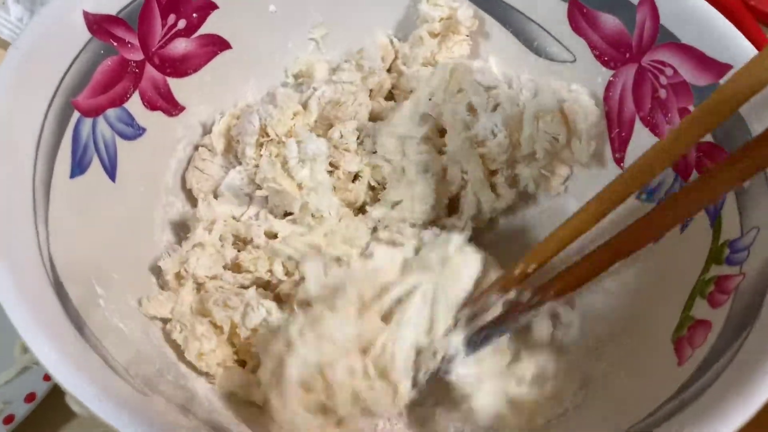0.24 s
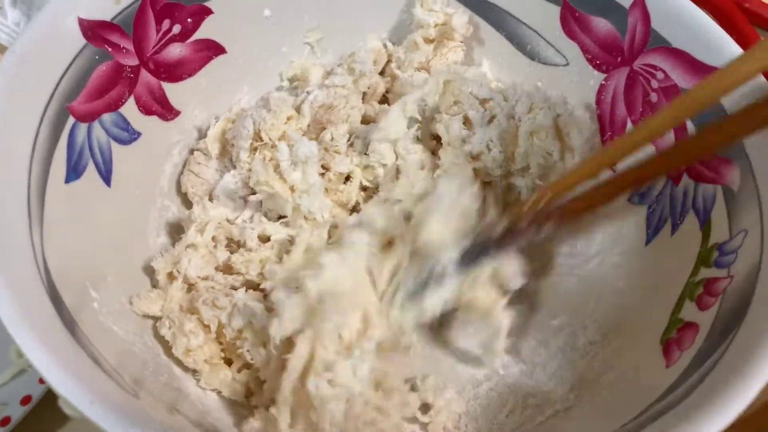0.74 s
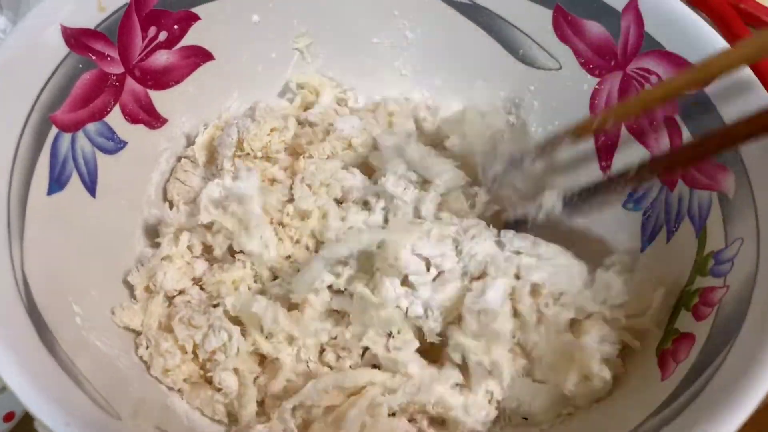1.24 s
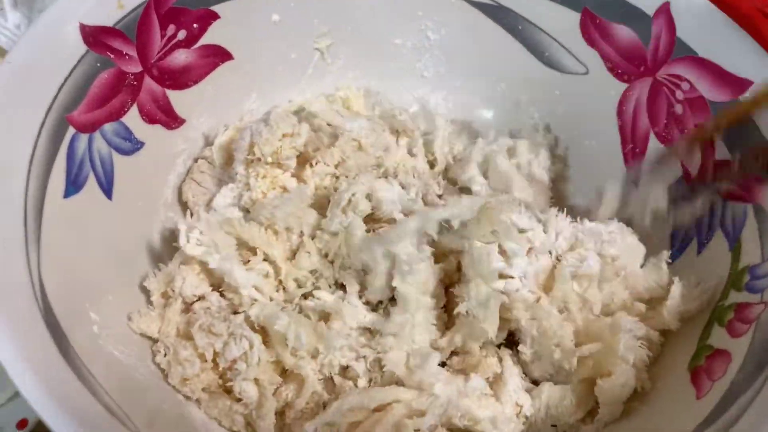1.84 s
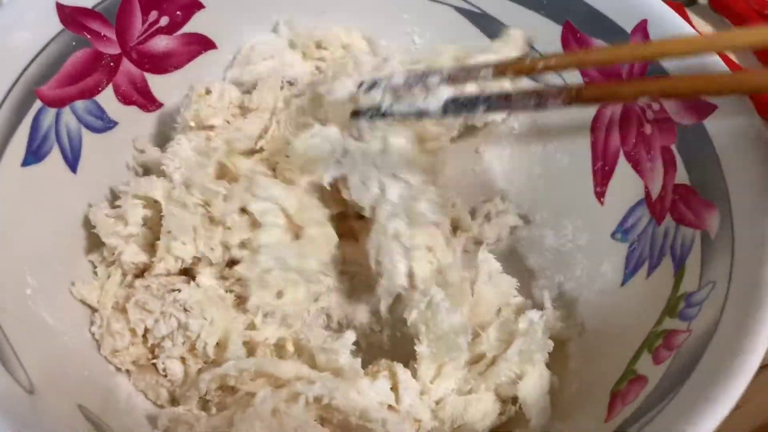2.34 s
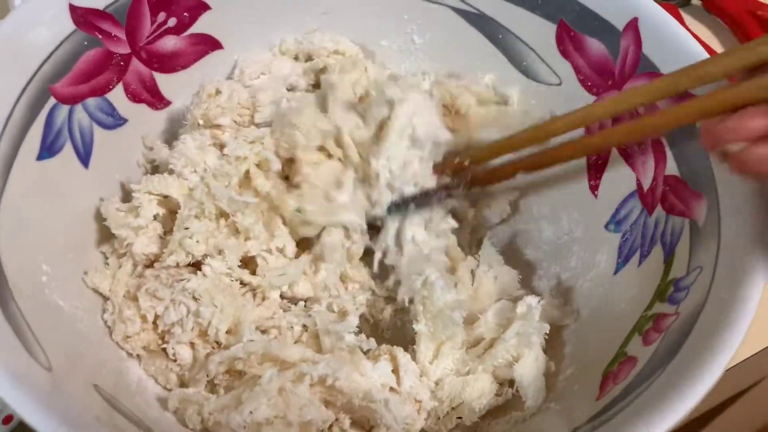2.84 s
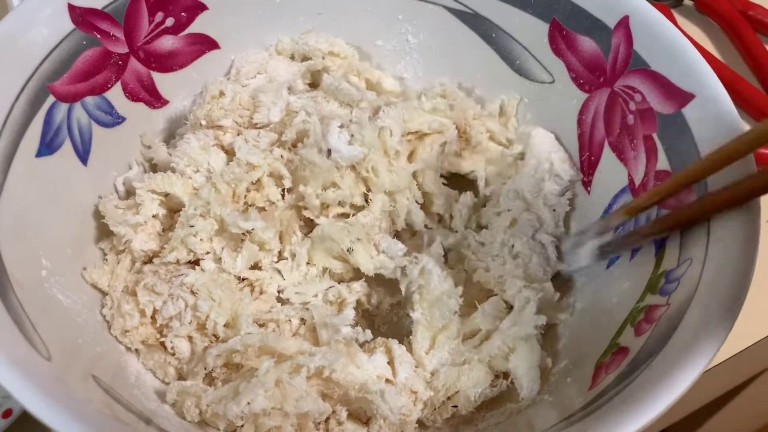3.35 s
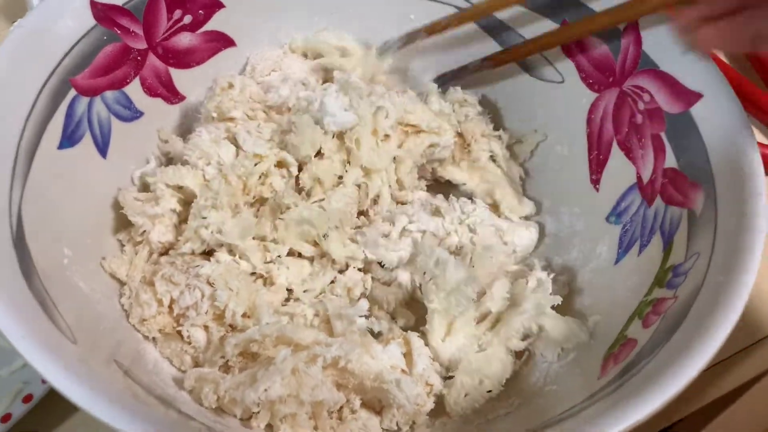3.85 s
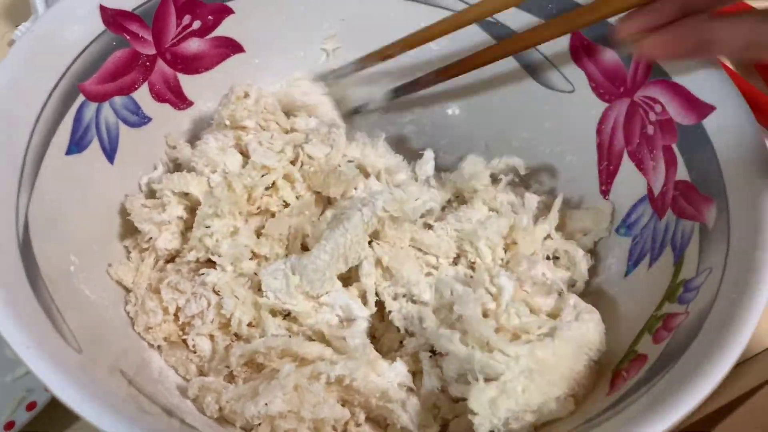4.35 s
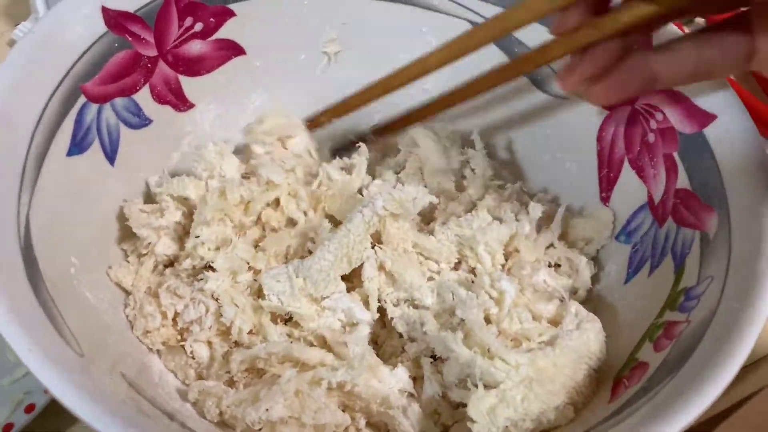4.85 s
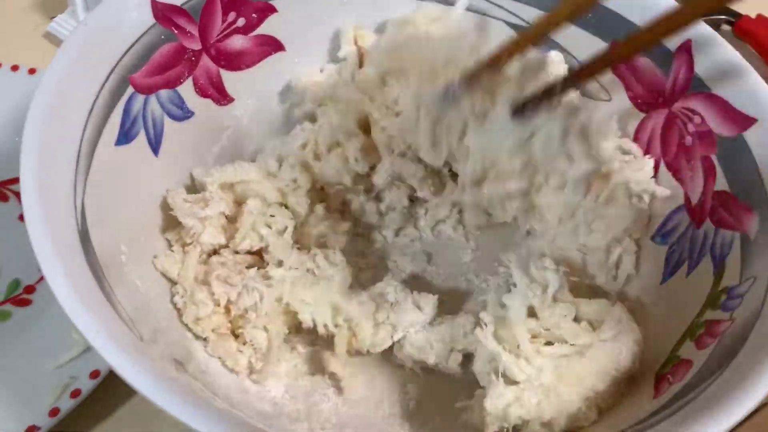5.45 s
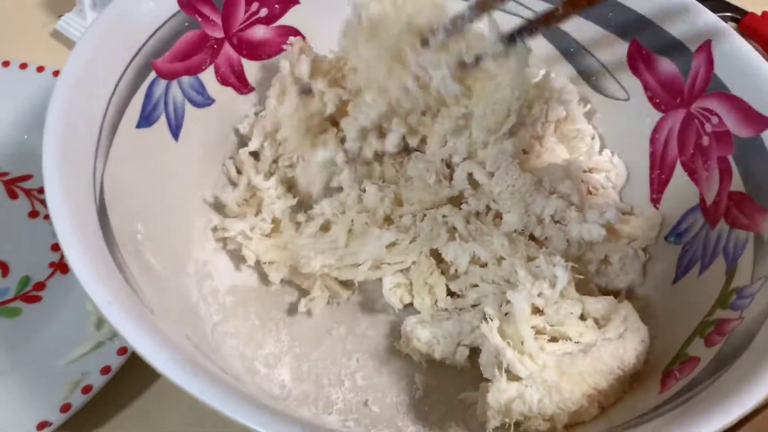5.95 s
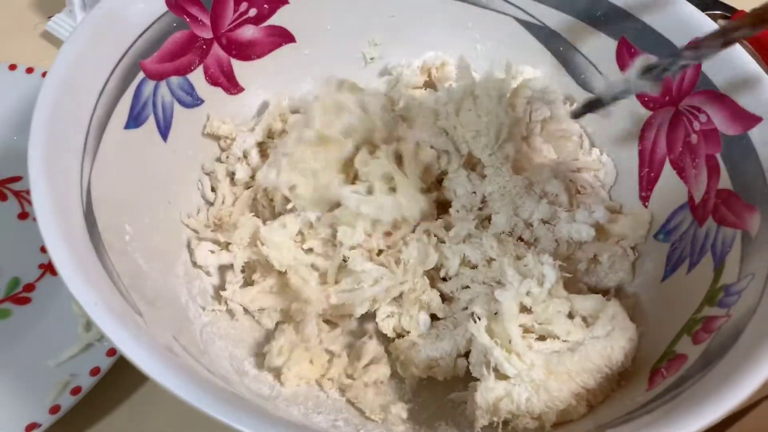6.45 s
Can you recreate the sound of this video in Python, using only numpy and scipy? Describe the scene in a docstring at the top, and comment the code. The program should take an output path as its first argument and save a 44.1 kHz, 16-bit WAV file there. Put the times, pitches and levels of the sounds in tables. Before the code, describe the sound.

Close up in a small kitchen, wooden chopsticks stir floury shreds in a ceramic bowl. Sharp, irregular clicks and dull knocks lead into short dry scrapes, soft scoops and scattered crumb ticks. Around two and three seconds harder blows make a nearby plate ring thinly. Tapping grows lighter, then a quick cluster comes just before six seconds, leaving soft scoops over a steady low hum.

```python
"""Wooden chopsticks toss floured mushroom in a ceramic bowl in a small kitchen, close to a two-port microphone.
An appliance hums throughout. From the first moment taps click on the bowl, which thuds on the counter;
after many taps the tips drag through flour and food, and between them they scoop and loose crumbs tick.
From about two seconds, three blows also ring a neighbouring plate, which the bowl soon partly mutes.
Most later taps are lighter, until a strong cluster near 5.8 seconds; at the end only soft scoops are left."""
import sys
import numpy as np
from scipy import signal
from scipy.fft import rfft, irfft
from scipy.io import wavfile
from scipy.ndimage import uniform_filter1d

SR = 44100
rng = np.random.default_rng(int(sys.argv[2]) if len(sys.argv) > 2 else 0)


def transcribe(signal):
    """Save signal, clipped to [-1, 1], as a 16-bit WAV file at the path in sys.argv[1]."""
    frames = np.atleast_2d(signal).T
    limited = np.clip(frames, -1, 1)
    pcm = np.round(limited * 32767).astype(np.int16)
    wavfile.write(sys.argv[1], SR, pcm)


N = 295029

# Every tap of the sticks on the bowl, with the strength of each part of the blow:
# t/s, click/dB, counter boom/dB, thud/dB, knock/dB, stick/dB, contact time/ms
TAPS = [(0.0014, -23.5, -40, -33, -32.5, -50.5, 5.5), (0.1039, -30.5, -35, -38, -34, -32.5, 7.3),
        (0.4031, -13.5, -38, -24.5, -15, -29.5, 8.9), (0.9262, -17.5, -27.5, -30.5, -34, -37, 0.96),
        (1.3762, -19, -20, -23.5, -26.5, -29.5, 5), (1.7826, -3, -36, -25, -13, -25.5, 6.84),
        (1.8785, -38, -54, -34.5, -34.5, -46, 3), (2.0672, -7.5, -32, -36, -22.5, -23.5, 4.9),
        (2.0979, -12.5, -16.5, -23, -1, -10.5, 2.1), (2.1122, -43, -22.5, -27, -15, -38, 4.2),
        (2.1243, -20.5, -36.5, -44.5, -22, -16, 3.2), (2.158, -38, -50, -51.5, -46, -26.5, 3.3),
        (2.438, -66, -60.5, -61, -45, -54, 5), (2.7545, -42, -37.5, -39.5, -31, -23, 3.8),
        (2.913, -66, -69.5, -51.5, -42, -52.5, 8.3), (2.9889, -37, -42, -62.5, -52.5, -66, 6.5),
        (3.0608, -2.5, -54, -27, -29, -26.5, 5.35), (3.2899, -12.5, -47, -23, -27.5, -37.5, 9),
        (3.3578, -27, -41.5, -30.5, -68, -38, 19), (3.406, -52, -49.5, -58, -50, -31, 6.7),
        (3.49, -55.5, -47, -52, -41.5, -48, 6.6), (3.5059, -54, -39.5, -51, -54.5, -46.5, 5.8),
        (3.7751, -33, -25.5, -39.5, -27.5, -29.5, 5.1), (3.8063, -36, -31.5, -54, -44, -30.5, 8.1),
        (3.8278, -41, -35, -68, -53, -26.5, 7.7), (4.2771, -37, -42, -29.5, -36.5, -41.5, 4.5),
        (4.335, -59.5, -47, -33, -55, -62.5, 6), (4.6935, -33, -25.5, -26.5, -39.5, -44.5, 5),
        (4.8662, -52, -52.5, -52, -51, -35.5, 3), (4.8775, -27, -45, -48, -52, -26, 5.6),
        (5.1728, -28.5, -38, -24.5, -41.5, -34.5, 5.2), (5.45, -57.5, -59, -63.5, -50.5, -55.5, 3.4),
        (5.619, -31, -30, -45, -36.5, -42.5, 5.4), (5.669, -40, -41.5, -63, -43, -57, 2.8),
        (5.7927, -21.5, -36.5, -32, -39, -15, 5.1), (5.8064, -20.5, -32, -21.5, -23.5, -51, 6.4),
        (5.8144, -25, -43, -32, -67, -9.5, 6.6), (5.8525, -45, -36.5, -56, -47.5, -20, 4),
        (5.863, -55, -51.5, -48.5, -49.5, -25.5, 4), (5.99, -67.5, -55, -55.5, -63, -43, 9.1)]


def gain_of(db):
    """Turns decibels into a factor."""
    return 10 ** (np.asarray(db) / 20)


def evened(x):
    """Scales a signal to an rms (average strength) of 1."""
    return x / np.sqrt(np.mean(x ** 2) + 1e-20)


def read(points, hz):
    """Reads a (f/Hz, value) table between its points, along a log-frequency axis."""
    f, value = np.transpose(points)
    return np.interp(np.log(hz + 1), np.log(f + 1), value)


def add(mix, s, sound):
    """Mixes a sound in at s seconds, cutting off what runs past the end."""
    part = mix[..., round(s * SR):][..., :sound.shape[-1]]
    part += sound[..., :part.shape[-1]]


def taps():
    """Each tap is a dry snap plus the dying modes of the bowl, both weighted by the colour of the blow."""
    # Centres of the six parts of a blow: boom, thud, knock, stick, click, tick: f/Hz
    blow_hz = (140, 240, 600, 1350, 3300, 9000)
    # Modes of bowl, sticks and counter, before shortening: f/Hz, level/dB, t60/s
    bowl_modes = [(141.8, -3.5, 0.49), (234.3, 3.5, 0.13), (339.3, 1.5, 0.12), (429, 10, 0.044),
                  (545.6, 6, 0.042), (738, -1, 0.059), (822.7, 7.5, 0.033), (1052, -5.5, 0.064),
                  (1280, -3, 0.086), (1373.7, -2, 0.077), (1558, -2, 0.028), (1857, 0.5, 0.026),
                  (2504, -6.5, 0.033), (3236, -1, 0.041), (3271, -7, 0.055), (3653, -4.5, 0.039),
                  (3950, -10.5, 0.037), (4550, -10, 0.081), (5446, -14, 0.029), (6210, -13.5, 0.071),
                  (8150, -5.5, 0.032)]
    # Colour of the dry snap of contact: f/Hz, level/dB
    snap_colour = [(300, -19.5), (1000, -9), (3000, 1.5), (8000, 1.5), (11000, -2), (14000, -4.5),
                   (16500, -38)]
    tick_db, tick_db_per_ms = 19.5, -6  # the shorter the contact, the brighter the tick over the click
    thud_lag_ms = 6.3  # the bowl rocks onto the counter just after the tap
    knock_lag_ms = 1.3  # the body of the bowl answers after the first click
    ring_factor = 0.6  # factor on every mode's t60
    out = np.zeros((2, N))
    t = np.arange(SR // 3) / SR
    hz, mode_db, t60 = np.transpose(bowl_modes)[:, :, None]
    lag_ms = np.where(hz < 300, thud_lag_ms, (hz < 1100) * knock_lag_ms)
    since = np.maximum(t - lag_ms / 1000, 0)
    f = np.fft.rfftfreq(4096, 1 / SR)
    for s, click_db, boom_db, thud_db, knock_db, stick_db, ms in TAPS:
        bright_db = click_db + tick_db + tick_db_per_ms * ms
        blow = list(zip(blow_hz, (boom_db, thud_db, knock_db, stick_db, click_db, bright_db)))
        detune, spot, phase, apart = rng.standard_normal((4, len(bowl_modes), 1))
        rise = 1 - np.exp(-since / (0.31 / hz + ms * 0.0003))  # builds over part of a cycle and of the contact
        start_db = read(blow, hz) + mode_db + 1.2 * spot  # each mode's level varies from tap to tap
        fall = gain_of(start_db - 60 * since / (t60 * ring_factor))
        # each mode's pitch varies slightly at random from tap to tap
        turn = 2 * np.pi * hz * (1 + .006 * detune) * t
        views = []
        for side in (0, 1):
            angle = turn + 2 * phase + side * (np.pi + apart) / 2
            views.append((rise * fall * np.sin(angle)).sum(0))
        sound = np.array(views)
        u = t[:4096] * 1000 / np.clip(ms, .3, 30)  # time counted in contact times
        snap = rng.standard_normal((2, 4096)) * 8 * u * np.exp(-3 * u)
        colour = gain_of(read(blow, f) + read(snap_colour, f))
        # moved 64 samples later while it is coloured, then back
        snap = irfft(rfft(np.roll(snap, 64, axis=1)) * colour, 4096)
        sound[:, :4032] += snap[:, 64:]
        add(out, s, sound)
    return out


def strokes():
    """Flour hisses, the tips excite the bowl's upper modes, and lumps of food knock its lower ones."""
    # Colour of the flour hiss: f/Hz, relative level/dB per Hz
    hiss_colour = [(3000, -29), (5000, -7.5), (7000, -5), (9500, -3), (13000, 0.5), (14600, -2.5),
                   (15500, -7), (16500, -36)]
    # Modes rubbed by the tips: f/Hz, width/Hz, level/dB
    rub_modes = [(2760, 460, -3.5), (3120, 32, -2), (3670, 2100, -0.5), (4111, 1400, -15)]
    # Modes knocked by the food: f/Hz, width/Hz, level/dB
    tumble_modes = [(590, 220, -1.5), (925, 220, 4.5), (1414, 260, -0.5), (1568, 190, -2)]
    hiss_gain, rub_gain, tumble_gain = stroke_gains()
    colour = gain_of(read(hiss_colour, np.fft.rfftfreq(N, 1 / SR)))
    flour = grit(440, 6.7, 0.36, 3.2, 2.9, patchy_db=3.0)
    hiss = evened(irfft(rfft(flour) * colour, N))
    rub = resonances(grit(200, 3.2, .5, 1.6, 3, patchy_db=4), rub_modes)
    tumble = resonances(grit(150, 3.2, .7, 2.3, 4, patchy_db=3), tumble_modes)
    return hiss_gain * hiss + rub_gain * rub + tumble_gain * tumble


def stroke_gains():
    """Gains of hiss, rub and tumble: drags and scoops add in power over a constant faint level."""
    # Drags start with a tap, hold while the tips push through, then lift:
    # start t/s, length/s, flour hiss/dB, tips rubbing the glaze/dB, food tumbling/dB
    drags = [(0.0, 0.17, -44, -48.5, -51.5), (0.396, 0.27, -52.5, -59, -45), (0.915, 0.32, -47, -46, -51),
             (1.36, 0.12, -43, -47.5, -66), (1.77, .28, -49.5, -37.5, -42.5),
             (2.059, 0.077, -66, -30.5, -30), (2.743, 0.013, -59, -56.5, -52), (3.046, 0.2, -83, -40, -54),
             (3.298, 0.27, -59.5, -49.5, -52), (3.78, 0.27, -49, -45, -40.5),
             (4.275, 0.22, -49.5, -60, -57.5), (4.688, .2, -48, -53.5, -52), (5.164, 0.23, -47, -46, -53.5),
             (5.618, 0.14, -45.5, -55.5, -64), (5.78, 0.017, -50.5, -40, -35)]
    # The tips scoop along the bowl and swell: centre t/s, half-width/s, hiss/dB, rub/dB, tumble/dB
    scoops = [(0.115, 0.014, -43, -37.5, -36), (0.519, 0.063, -45, -51, -60), (0.9, 0.031, -62, -67, -77),
              (1.12, 0.041, -49.5, -55, -49.5), (1.515, 0.061, -73, -53, -51),
              (2.04, 0.075, -47, -43.5, -41.5), (2.285, 0.034, -59.5, -58, -54.5),
              (3.384, 0.04, -44, -41.5, -40.5), (3.501, 0.012, -52.5, -57, -43),
              (4.029, 0.035, -62.5, -57.5, -50.5), (4.439, 0.024, -58.5, -54, -57.5),
              (4.874, 0.018, -49, -43, -41), (5.32, 0.041, -74, -56, -51),
              (5.761, 0.068, -64, -52.5, -46.5), (6.05, 0.046, -59.5, -68.5, -70),
              (6.18, 0.062, -56.5, -63.5, -65.5), (6.66, 0.041, -47.5, -57, -61)]
    # Fall while the drag holds: hiss, rub, tumble, all in dB per s
    sag = (28.5, 83.5, 89.5)
    # Further fall once the tips lift: hiss, rub, tumble, all in dB per s
    lift = (170.5, 112.5, 71)
    # Constant faint level beneath the strokes: hiss/dB, rub/dB, tumble/dB
    floor_level = (-76.5, -80, -70.5)
    attack_s = 0.0033
    t = np.arange(0, N + 64, 64) / SR
    power = gain_of(floor_level)[:, None] ** 2 * np.ones(len(t))
    tap_times = [tap[0] for tap in TAPS]
    for s, length, *db in drags:
        nearest_tap = min(tap_times, key=lambda tap_s: abs(tap_s - s))  # the drag begins here
        since = np.maximum(t - nearest_tap, 0)
        fall_db = np.outer(sag, since) + np.outer(lift, np.maximum(since - length, 0))
        attack = np.minimum(since / attack_s, 1)
        power = power + (attack * gain_of(np.c_[db] - fall_db)) ** 2
    for s, width, *db in scoops:
        power = power + gain_of(np.c_[db]) ** 2 * np.exp(-((t - s) / width) ** 2)
    return [np.interp(np.arange(N) / SR, t, np.sqrt(p)) for p in power]


def grit(per_s, spread_db, share, flutter_db, grain_ms, patchy_db):
    """Fine noise with scattered short bursts, fluttering and changing colour as the tips stick and slip."""
    strength = rng.exponential(1, N)
    size = gain_of(spread_db * np.minimum(strength, 4)) * (rng.random(N) < per_s / SR)
    bursts = signal.lfilter([1], [1, -np.exp(-1000 / (grain_ms * SR))], size)  # each burst dies away
    flutter = evened(uniform_filter1d(rng.standard_normal(N), 700))
    z = signal.stft(rng.standard_normal((2, N)), nperseg=256)[2]
    # patches of time and pitch that come out louder or softer
    patches = uniform_filter1d(rng.standard_normal(z.shape[:0:-1]), size=12, axis=0)
    patches = evened(uniform_filter1d(patches, size=4, axis=1)).T
    noise = signal.istft(z * gain_of(patchy_db * patches), nperseg=256)[1][:, :N]
    return noise * (1 + share * evened(bursts)) * gain_of(flutter_db * flutter)


def resonances(x, table):
    """Rings a signal through steep resonances (f/Hz, width/Hz, level/dB), then evens it."""
    f = np.fft.rfftfreq(N, 1 / SR)
    shape = sum(gain_of(db) / (1 + 2j * (f - hz) / width) ** 2 for hz, width, db in table)
    return evened(irfft(rfft(x) * shape, N))


def crumbs():
    """Each loose crumb ticks onto the glaze: bright noise dying in about a millisecond."""
    # Crumb ticks: t/s, level/dB
    crumb_ticks = [(0.2538, -42), (0.6789, -41), (0.817, -54), (1.199, -57), (1.262, -51), (1.288, -47),
                   (2.2754, -37.5), (4.4817, -44), (4.4937, -46), (4.5306, -47), (4.566, -43.5),
                   (5.0088, -36.5), (5.0764, -51), (5.4173, -40), (5.526, -44), (5.905, -48), (6.033, -48),
                   (6.075, -40)]
    out = np.zeros((2, N))
    t = np.arange(200) / SR
    for s, db in crumb_ticks:
        bright = np.diff(rng.standard_normal(202), 2) / 2  # differences favour the treble
        add(out, s, gain_of(db) * bright * np.exp(-t / .001))
    return out


def plate():
    """Two long-ringing modes of a plate beside the bowl swell in through the counter."""
    # Modes of the plate, low then high: f/Hz, level/dB, t60/s
    plate_modes = [(1102, -3.5, 1.17), (2305, -1, 0.83)]
    # Blows that set the plate ringing: t/s, level/dB
    plate_blows = [(2.109, -42.5), (3.069, -40), (3.829, -51.5)]
    # The bowl nudges the plate and mutes its low mode: t/s, change/dB
    touch_s, mute_db = 3.295, -6
    out = np.zeros(N)
    t = np.arange(SR) / SR
    low, high = (gain_of(db - 60 * t / t60) * np.sin(2 * np.pi * hz * t) for hz, db, t60 in plate_modes)
    swell = 1 - np.exp(-t / 0.0045)
    for s, db in plate_blows:
        muted = np.clip((s + t - touch_s) / .01, 0, 1)  # 0 before the nudge, 1 after 10 ms
        add(out, s, gain_of(db) * (gain_of(mute_db * muted) * low + high) * swell)
    return out


def kitchen(x):
    """The room answers with sparse echoes of random sign, each band dying at its own speed."""
    # Echo time of the room: f/Hz, t60/s
    echo_time = [(200, 0.44), (1000, 0.25), (4000, 0.22), (12000, 0.29)]
    echoes = np.zeros((2, SR // 2))
    at = np.arange(300, SR // 2 - 20, 20)
    at = at + rng.integers(0, 20, (2, len(at)))  # one echo somewhere in every 20 samples
    np.put_along_axis(echoes, at, rng.choice([-1., 1.], at.shape), 1)
    hz, t, z = signal.stft(echoes, SR, nperseg=256)
    t60 = np.maximum(read(echo_time, hz), .05)[:, None]
    tail = signal.istft(z * gain_of(-60 * t / t60), SR, nperseg=256)[1]
    return signal.fftconvolve(x[None], tail / np.linalg.norm(tail[0]), axes=1)[:, :N]


def air():
    """Room noise with drifting patches, and the wavering hum of an appliance."""
    # Colour of the room noise: f/Hz, relative level/dB per Hz
    air_colour = [(34, -38.5), (58, -10.5), (91, -10), (185, -11.5), (297, -22.5), (343, -16.5), (577, -34),
                  (698, -30), (824, -47.5), (950, -42.5), (1900, -55), (2500, -50), (7290, -66.5),
                  (13500, -58), (16700, -67.5)]
    # Tones of the appliance: f/Hz, level/dB
    hum_tones = [(49.6, -58.5), (99.4, -52.5), (155, -50.5), (179, -55), (200, -58), (347, -63.5)]
    frames, hz = N // 512 + 5, np.fft.rfftfreq(2048, 1 / SR)
    a, b, c, d, patches = rng.standard_normal((frames, 1025, 5)).T
    patches = evened(uniform_filter1d(uniform_filter1d(patches, 12, 0), 8, 1))
    z = np.array([a + 1j * b, c + 1j * d]) * gain_of(read(air_colour, hz)[:, None] + .8 * patches)
    noise = evened(signal.istft(z, nperseg=2048, noverlap=1536)[1][:, :N])
    t = np.arange(N) / SR
    waver = uniform_filter1d(rng.standard_normal((len(hum_tones), N)), 9000, axis=1)
    hum = np.zeros(N)
    for (f, db), w in zip(hum_tones, waver):
        hum += np.sqrt(2) * gain_of(db + 0.76 * evened(w)) * np.sin(2 * np.pi * f * t)
    return gain_of(-45) * noise + hum


def ports(pair):
    """Blends two views of the sound field into the two ports, one a short path behind the other."""
    # Level difference of the ports: f/Hz, left minus right/dB
    port_tilt = [(300, 0.5), (900, 2), (3000, 3.5), (6000, -2), (9000, 0)]
    # How alike the ports are: f/Hz, likeness from 0 to 1
    port_same = [(300, 0.9), (700, 0.29), (1500, 0.15), (7000, 0.1), (9000, .85), (15000, 1), (16200, 0.22)]
    gap_s = .000295  # travel time between the ports
    f = np.fft.rfftfreq(N, 1 / SR)
    a, b = rfft(pair)
    same = np.clip(read(port_same, f), 0, .995)
    tilt = gain_of(read(port_tilt, f) / 2)  # half the difference on each side
    half_turns = 2 * gap_s * f
    lead = np.pi * np.where(half_turns < 1, half_turns ** 3, -half_turns)  # left leads in the bass, lags above
    right = (same * a + np.sqrt(1 - same ** 2) * b) * np.exp(-1j * lead)
    return irfft([a * tilt, right / tilt], N)


def scene():
    """Bowl and food reach the ports directly and through the room, with plate and air added."""
    knocks = taps() + crumbs()
    drags = strokes()
    room = gain_of(-11.5) * kitchen(knocks[0] + drags[0])
    return ports(knocks + drags + plate() + room + air())


def record(dry):
    """Clips peaks at 0.8, then removes the deep bass and the very top of the treble."""
    low_cut = signal.butter(6, 42, "high", fs=SR, output="sos")
    thin = signal.sosfilt(low_cut, np.clip(dry, -.8, .8))
    edge = signal.firwin(1023, 16650, window=("kaiser", 9), fs=SR)  # upper limit in Hz
    return signal.oaconvolve(thin, edge[None], "same")


dry = scene()
out = record(dry)
transcribe(out)
```